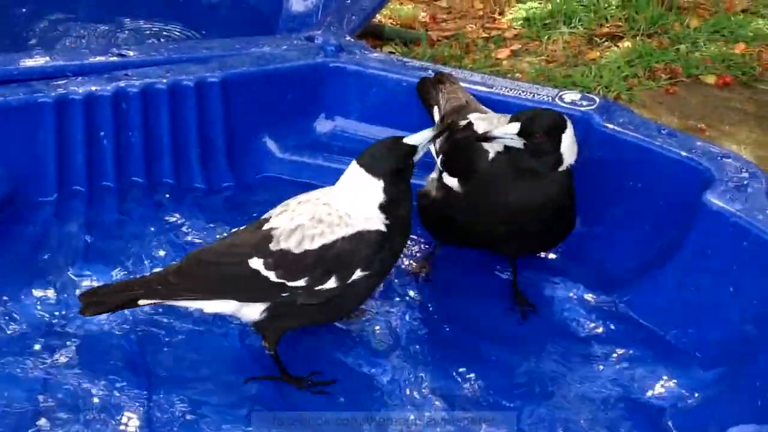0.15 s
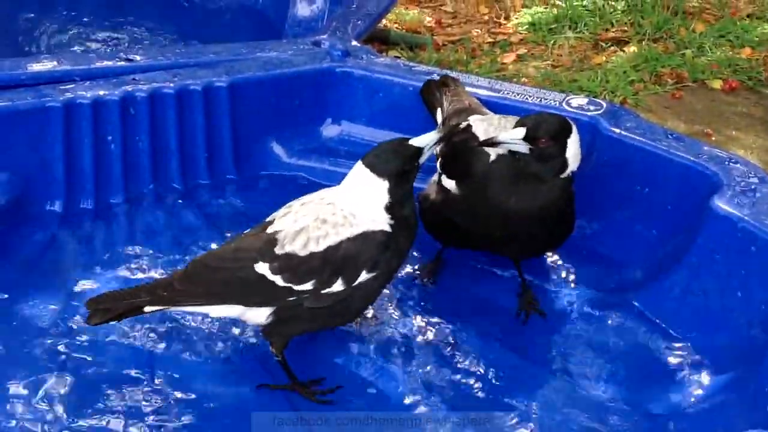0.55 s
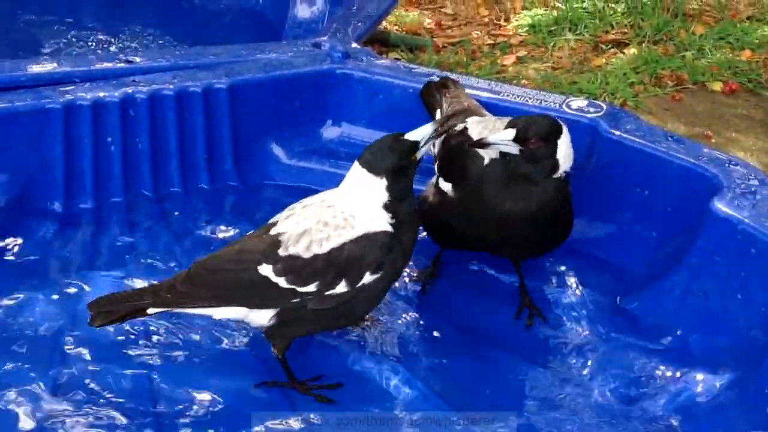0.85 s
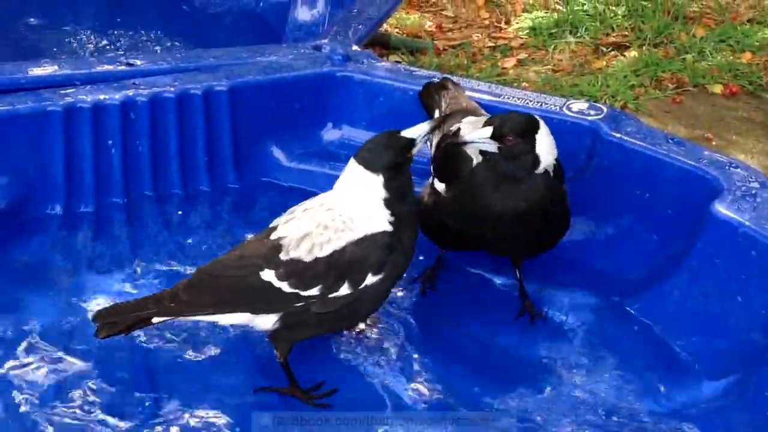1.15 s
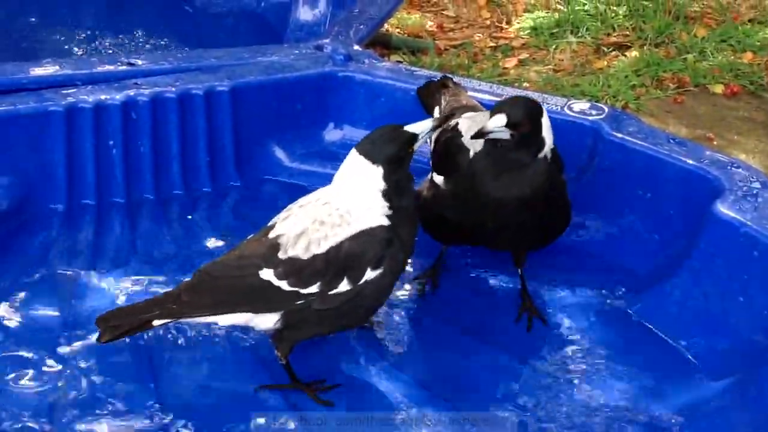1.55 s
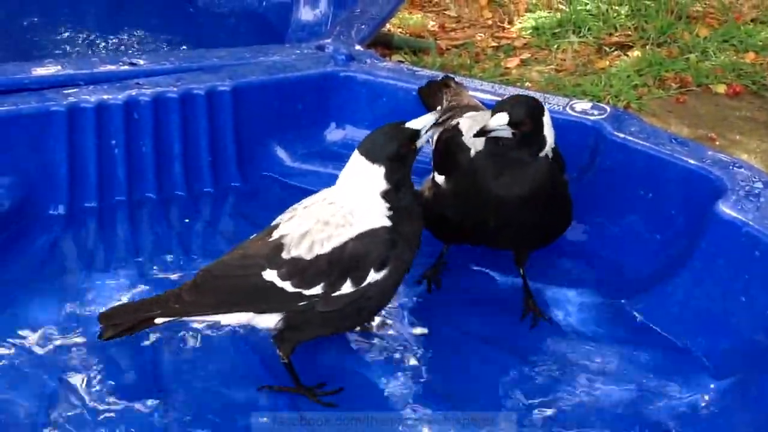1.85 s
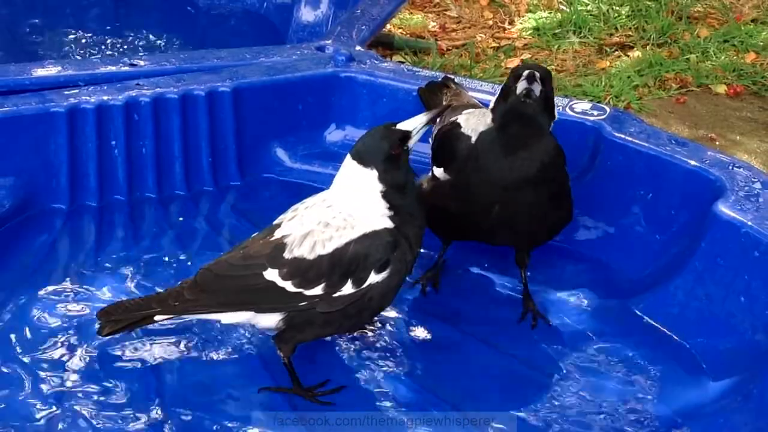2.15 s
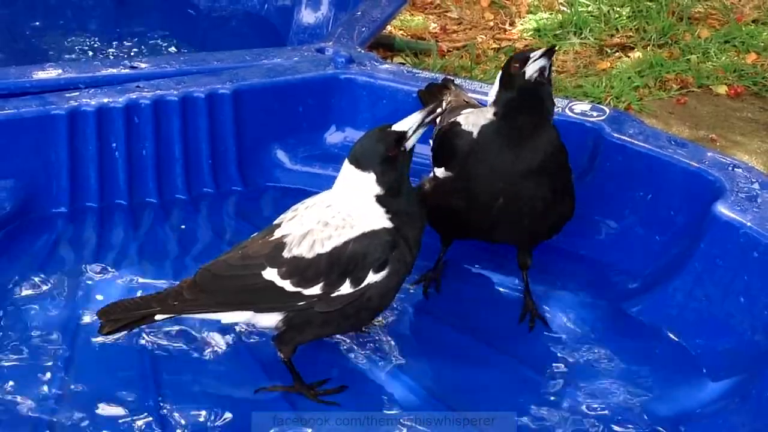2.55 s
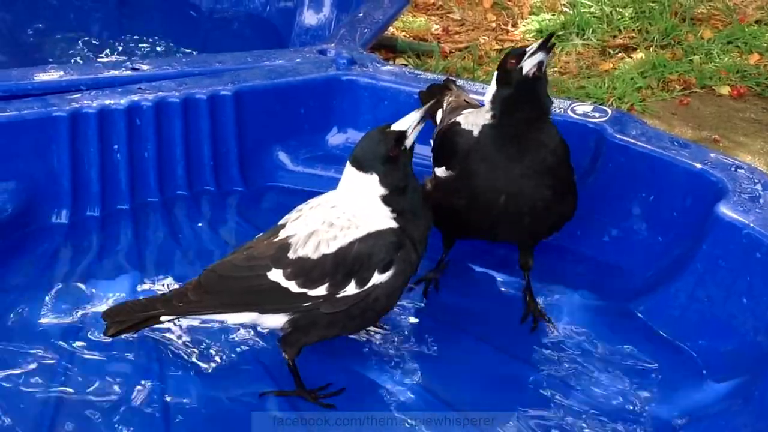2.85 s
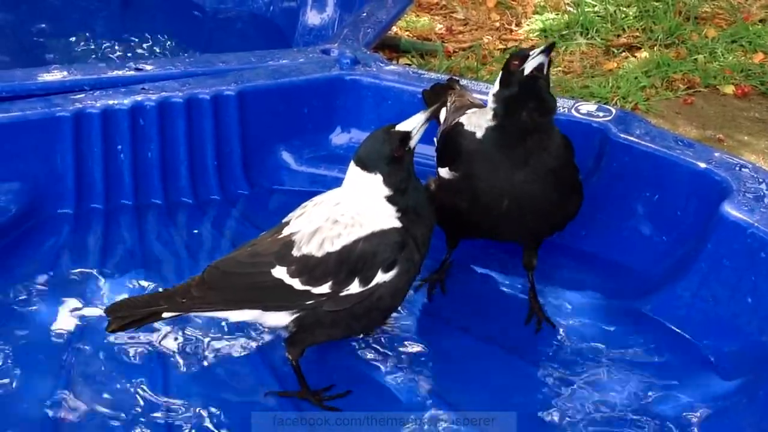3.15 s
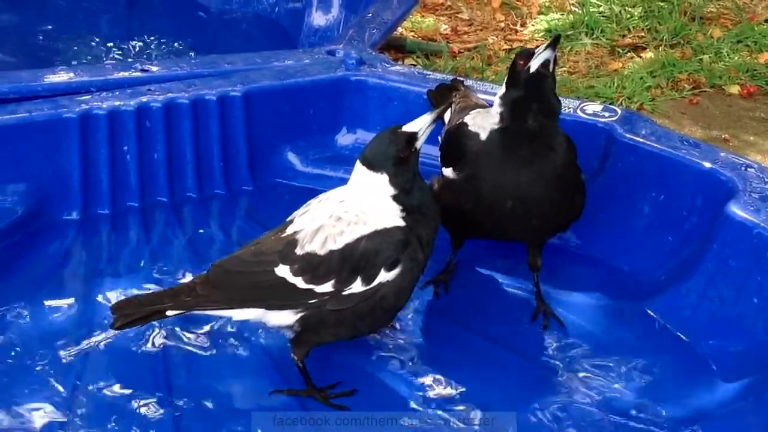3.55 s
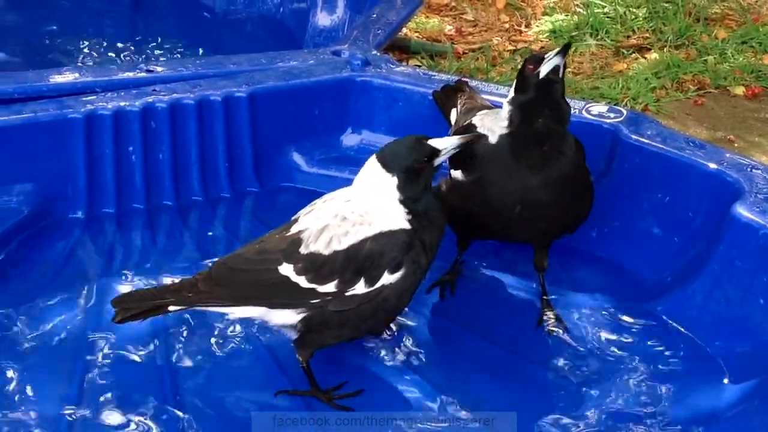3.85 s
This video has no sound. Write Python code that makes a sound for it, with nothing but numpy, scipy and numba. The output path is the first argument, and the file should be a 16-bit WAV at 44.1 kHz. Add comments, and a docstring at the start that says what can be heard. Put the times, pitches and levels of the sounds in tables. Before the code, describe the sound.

Magpies warble in overlapping whistles and throaty notes while water patters softly outdoors.

```python
"""Two magpies carol up close in a shallow plastic paddling pool. From the start, water patters and drips
over a quiet garden, and the birds, with two voices each, trade overlapping whistles and low throbbing
notes; hard notes rasp. Diving yelps join at 0.6 s as a distant rush swells and fades. From 1.2 to 2.5 s
two low voices lock into a buzz three times, with short whistles, yelps and low throbs in between. The
carol ends on a low throb near 4 s. All along, the garden returns a short echo of birds and water."""
import sys
import numpy as np
from scipy import signal
from scipy.fft import rfft, irfft
from scipy.io import wavfile
from scipy.ndimage import map_coordinates
from numba import njit

SR = 44100
rng = np.random.default_rng(int(sys.argv[2]) if len(sys.argv) > 2 else 0)


def log_audio(samples):
    """Write samples as a 16-bit WAV file to the path given in sys.argv[1]."""
    # one column per channel
    frames = np.atleast_2d(samples).T
    # limit to full scale, then quantise
    limited = np.clip(frames, -1, 1)
    pcm = np.round(limited * 32767).astype(np.int16)
    wavfile.write(sys.argv[1], SR, pcm)


N = 176400

# Tone of the garden air. Each row: frequency in Hz, relative level in dB.
GARDEN_SPECTRUM = [(18, -34), (30, -28), (130, -10.5), (187, -7), (249, -7), (505, -10), (1050, -1.5),
                   (1440, -9), (2100, -12), (2490, -7), (3070, -16), (3880, -12), (5590, -19), (9190, -19),
                   (15500, -23)]
# Fader ride on that air. Each row: time in seconds, gain in dB.
GARDEN_SWELL = [(0, -1), (.6, -1), (1.2, -2), (1.6, -4.5), (2.2, 2.5), (4, 0)]
# The distant rush. Each row: time in seconds, level in dB.
RUSH_LEVELS = [(0, -63.5), (.45, -59.5), (.62, -60.5), (.8, -66), (4, -70)]
# Beds of ringing bubbles. Each row: centre pitch in Hz, bubbles per second, bed level in dB,
# decay in seconds.
BUBBLES = [(2537, 70, -62, 0.0043), (4275, 55, -66.5, 0.003), (7700, 25, -71.5, 0.0024)]
# The clearest drops. Each row: start in seconds, level in dB, ring pitch in Hz.
DROPS = [(0.165, -30, 9020), (0.2365, -33.5, 9100), (0.2757, -27.5, 7530), (0.3828, -31, 10900),
         (0.759, -33.5, 7260), (1.123, -39.5, 4130), (1.18, -37, 4270), (1.482, -34, 9000),
         (1.6624, -38.5, 3750), (1.676, -36, 4430), (1.8458, -27.5, 8750), (2.2136, -31, 9000),
         (2.6873, -34.5, 7850), (2.8496, -31, 12300), (3.0966, -32, 8900), (3.2828, -36, 7200)]
# Whistled notes. Each row: start and length in seconds, first and last pitch in Hz, level in dB,
# attack and release in seconds, overtone and rasp weights in dB.
WHISTLES = [ (0, 0.053, 1054, 1178, -41, 0.0016, 0.0096, -45, -19.5),
            (0.066, 0.042, 1333, 1220, -36.5, 0.027, 0.012, -48, -48),
            (0.111, 0.093, 1036, 1064, -23, 0.18, 0.0075, -63, -27.5),
            (0.619, 0.049, 1264, 1267, -26.5, 0.0048, 0.0098, -12, -13.5),
            (0.631, 0.049, 1002, 1040, -21, 0.019, 0.01, -51, -12.5),
            (0.745, 0.039, 1134, 1390, -23.5, 0.011, 0.028, -50, -21),
            (0.764, 0.1, 1652, 1713, -22, 0.018, 0.0038, -35.5, -28.5),
            (0.893, 0.14, 1194, 1215, -21, 0.025, 0.026, -28, -43),
            (1.023, 0.054, 1220, 1199, -38, 0.015, 0.059, -24, -9),
            (1.053, 0.046, 1026, 966, -39, 0.064, 0.014, -37, -8.5),
            (1.614, 0.046, 1078, 998, -39.5, 0.011, 0.021, -33, -26),
            (1.785, 0.035, 1054, 1144, -22.5, 0.031, 0.0088, -54, -31),
            (1.926, 0.068, 2360, 2273, -34.5, 0.057, 0.014, -38, -33),
            (1.981, 0.033, 2200, 1640, -39, 0.0053, 0.0083, -52, -82),
            (1.984, 0.068, 1504, 1360, -33.5, 0.017, 0.0027, -66, -15),
            (1.999, 0.042, 1183, 986, -22, 0.096, 0.0046, -20, -21),
            (2.066, 0.033, 977, 1200, -21.5, 0.035, 0.026, -49, -13.5),
            (2.283, 0.037, 1086, 1124, -8.5, 0.13, 0.018, -39, -32),
            (2.493, 0.04, 1725, 1607, -23.5, 0.017, 0.025, -18, -24.5),
            (2.525, 0.1, 1276, 1261, -16.5, 0.096, 0.014, -20, -25.5),
            (2.615, 0.03, 1025, 1011, -23.5, 0.0058, 0.016, -38, -11.5),
            (2.633, 0.026, 1221, 1360, -18.5, 0.0015, 0.031, -27, -18.5),
            (2.651, 0.036, 1983, 2260, -22.5, 0.028, 0.028, -41, -17),
            (2.671, 0.035, 1835, 1836, -30.5, 0.014, 0.016, -36, -13.5),
            (2.682, 0.15, 1438, 1437, -24, 0.061, 0.0039, -28.5, -24),
            (2.806, 0.0088, 1696, 1660, -16, 0.0043, 0.01, -17, -19),
            (2.828, 0.15, 1231, 1236, -23.5, 0.019, 0.086, -9.5, -26),
            (2.849, 0.11, 1026, 1007, -18, 0.06, 0.016, -33.5, -26.5),
            (2.948, 0.11, 1271, 1147, -28, 0.035, 0.22, -28, -34),
            (3.092, 0.056, 1122, 944, -35.5, 0.017, 0.032, -35, -41),
            (3.363, 0.049, 1325, 1275, -35, 0.016, .015, -13, -6),
            (3.387, .06, 1292, 1293, -22.5, 0.0099, 0.013, -11, -13.5),
            (3.413, 0.045, 999, 1031, -20.5, 0.0062, 0.01, -17.5, -10.5),
            (3.446, 0.056, 1345, 1311, -24, 0.014, 0.1, 6, -7),
            (3.463, 0.076, 2067, 2003, -30.5, 0.028, 0.08, -30, -44),
            (3.515, 0.064, 1013, 993, -26, 0.046, 0.014, -33, -54),
            (3.814, 0.041, 1086, 1132, -19, 0.0098, 0.034, -27, -22),
            (3.772, 0.048, 890, 830, -41, 0.0096, 0.013, -22, -31),
            (3.79, 0.073, 1112, 1095, -34.5, 0.022, 0.014, -51, -22)]
# Whistle overtones, richest in the odd ones. Each row: harmonic number, weight in dB.
WHISTLE_HARMONICS = [(2, -10.5), (3, 2.5), (4, -17), (5, -13), (7, -19.5)]
# Low throbbing notes. Each row: start and length in seconds, first and last pitch in Hz, level in dB,
# attack and release in seconds, throbs per second, throb depth from 0 to 1, rasp weight in dB.
CHORTLES = [ (0.038, 0.041, 745, 715, -27, 0.0063, 0.058, 50.4, 0.99, -34),
            (0.217, 0.062, 677, 681, -35.5, 0.044, 0.0053, 51, 0.57, -41),
            (1.168, 0.024, 706, 792, -27, 0.0085, 0.013, 72, 0.36, -35),
            (1.206, 0.033, 789, 820, -21.5, 0.0041, 0.013, 55, 1, -26),
            (1.598, 0.026, 765, 806, -29, 0.014, 0.012, 42, 0.4, -22),
            (2.044, 0.041, 768, 794, -27, 0.0076, 0.024, 55, 0.75, -16.5),
            (2.097, .05, 902, 868, -25.5, 0.026, 0.036, 85, 0.54, -9),
            (2.133, 0.15, 645, 671.7, -27, 0.087, 0.0057, 82, 0.42, -44),
            (2.455, 0.039, 711, 839, -19, 0.017, 0.014, 74.8, 0.85, -22.5),
            (2.754, 0.041, 777, 814, -33.5, .01, 0.017, 45, 1, -23),
            (3.079, 0.045, 763, 780, -21.5, 0.018, 0.03, 45.6, 0.82, -42),
            (3.114, 0.1, 694, 663, -23.5, 0.059, 0.012, 25, 0.46, -31),
            (3.214, 0.053, 792, 834, -21, 0.017, 0.015, 29, 0.46, -14),
            (3.583, .1, 806.5, 759.6, -16, 0.049, 0.048, 62.6, 0.84, -17.5),
            (3.838, 0.17, 779, 721, -28, 0.065, 0.046, 51.4, 1, -48)]
# Chortle overtones. Each row: harmonic number, weight in dB.
CHORTLE_HARMONICS = [(2, -3.5), (4, -16.5)]
# Sharp diving notes. Each row: start and length in seconds, landing pitch in Hz, level in dB,
# dive in octaves, rasp weight in dB.
YELPS = [(0.574, 0.024, 1566, -25.5, 0.51, -21), (.599, 0.018, 1500, -30, 0.13, -17),
         (0.882, 0.017, 1500, -20.5, 0.12, -27.5), (1.8897, 0.023, 1646, -16.5, 0.45, -26),
         (1.917, 0.022, 1500, -22.5, 0.107, -20), (3.348, 0.024, 1651, -19, 0.78, -15.5),
         (3.376, 0.017, 1550, -20, 0.17, -11)]
# Two low voices locked together. Each row: start and length in seconds, the lower voice's first and
# last pitch in Hz, upper pitch in Hz, level in dB, attack and release in seconds, rasp weight in dB.
BUZZES = [(1.192, 0.039, 828, 772, 937, -39.5, 0.026, 0.012, -6),
          (1.596, 0.21, 770, 712, 883, -35, 0.23, 0.06, 4.5),
          (2.319, 0.15, 691.7, 746.8, 894.3, -30.5, 0.12, 0.066, 4)]
# Tones of the buzz. Each row: multiple of the lower voice, multiple of the upper voice, weight in dB.
BUZZ_TONES = [(1, 0, 3), (0, 1, -3.5), (-1, 2, 0), (2, 0, -16), (1, 1, -9), (0, 2, -6), (0, 3, -14.5)]
# Narrow windpipe resonances. Each row: centre in Hz, width in Hz, gain in dB.
WINDPIPE = [(1890, 450, 8), (2560, 90, 2.5), (3005, 74, 5.5), (4540, 87, 0), (5080, 100, 2),
            (5885, 420, -1), (6800, 200, 2)]
# Resonances that move as throat and beak open. Each row: time in seconds, throat in Hz, beak in Hz.
GAPE = [(.65, 4110, 7380), (1.22, 3940, 8400), (2.41, 3830, 7930), (2.95, 3810, 8000), (3.25, 3220, 7950),
        (3.43, 4140, 8250), (3.63, 3780, 7550)]
# Reflections of the rasp off the water and pool walls. Each row: delay in seconds, linear gain.
POOL_REFLECTIONS = [(.0009, -0.0013), (.0023, -0.25), (.0037, .4), (.0058, 0.66)]
# Final EQ on the rasp. Each row: frequency in Hz, relative gain in dB.
RASP_EQ = [(1240, -28), (1750, -7), (3900, -1), (5000, -1.5), (7100, -12.5), (9600, -10.5), (12400, -11.5),
           (13500, -10), (15500, -24)]

GARDEN_DB, RUSH_BAND_HZ = -54, (184, 365)
PATTER_PER_S, PATTER_DB, PATTER_SPREAD_DB = 420, -59.5, 6.5
PATTER_HZ, PATTER_DECAY_CYCLES, DROP_DECAY_CYCLES = (7280, 14200), 1.6, 7.5
LAPS_PER_S, LAP_DB = 14, 3.5
WAVER, ROUGH_WAVER, WAVER_PER_S = .002, .11, 266.7
OVERTONE_FLUTTER, SHIMMER, FLUTTER_PER_S = 0.043, 0.11, 220.4
BREAK_DEPTH, BREAK_PER_S = .13, 700
RASP_JITTER_RAD, RASP_JITTER_PER_S, RASP_AIR, RASP_TRIM_DB = 0.27, 500, 0.46, -5.5
THROAT_WIDTH_HZ, THROAT_DB, BEAK_WIDTH_HZ, BEAK_DB, BEAK_OVERTONE = 570, 4, 140, 9, 1.51
VOICE_LOW_CUT_HZ, RASP_LOW_CUT_HZ, DIVE_S = 476, 1400, 0.00256
ECHO_DB, ECHO_DELAY_S, ECHO_T60_S, ECHO_TOP_HZ = -19, 0.014, .25, 7100
SLAP_S, SLAP_DB = 0.058, -30


def undb(db):
    """Decibels to gain."""
    return 10 ** (np.asarray(db) / 20)


def unit(x):
    """Scale to rms 1."""
    return x / np.sqrt(np.mean(x ** 2) + 1e-20)


def add(out, start, x):
    """Mix a sound in at a start time in seconds."""
    i = max(int(start * SR), 0)
    out[i:i + len(x)] += x[:max(N - i, 0)]


def colour(x, points):
    """EQ by a (Hz, dB) curve, then scale to rms 1."""
    hz, db = np.array(points).T
    bins_hz = np.maximum(np.arange(len(x) // 2 + 1) * SR / len(x), 1)
    gain = undb(np.interp(np.log(bins_hz), np.log(hz), db))
    return unit(irfft(rfft(x) * gain, len(x)))


def cut(x, hz, kind, order=2):
    """Butterworth filter."""
    return signal.sosfilt(signal.butter(order, hz, kind, fs=SR, output="sos"), x)


def wander(samples, rate):
    """A smooth random wobble, at `rate` steps a second."""
    steps = rng.standard_normal(size=256)
    return map_coordinates(steps, [np.arange(samples) / SR * rate], order=3, mode="mirror")


def swell(length, attack, release):
    """Time axis and rounded attack-hold-release envelope of a note."""
    t = np.arange(int(length * SR)) / SR
    ramp = lambda u: np.sin(np.pi / 2 * np.clip(u, 0, 1)) ** 1.366
    return t, ramp(t / attack) * ramp((length - t) / release)


@njit
def resonate(x, hz, width):
    """A resonance whose centre may move; gain 1 at the centre."""
    y, band_state, low_state = np.empty(len(x)), 0., 0.
    for i in range(len(x)):
        tuning, damping = np.tan(np.pi * hz[i] / SR), width / hz[i]
        band = (band_state + tuning * (x[i] + 1e-18 - low_state)) / (1 + tuning * (tuning + damping))
        band_state = 2 * band - band_state
        low_state += 2 * tuning * band
        y[i] = damping * band
    return y


def garden():
    """The bed: outdoor air that swells slowly, and a low distant rush."""
    fader = lambda points: undb(np.interp(np.arange(N) / SR, *np.array(points).T))
    rush = unit(cut(rng.standard_normal(N), RUSH_BAND_HZ, "band"))
    air = colour(rng.standard_normal(N), GARDEN_SPECTRUM)
    return undb(GARDEN_DB) * fader(GARDEN_SWELL) * air + fader(RUSH_LEVELS) * rush


def bubble(hz, decay):
    """A small bubble rings: a sine that starts within a cycle, rises a little and dies."""
    t = np.arange(int(6 * decay * SR) + 2) / SR
    env = (1 - np.exp(-t * hz)) * np.exp(-t / decay)
    return env * np.sin(2 * np.pi * hz * t * (1 + 0.011 * t / decay))


def patter():
    """Tiny droplets of every size tick on the water at random, more strongly as it laps."""
    out, (low, high) = np.zeros(N), PATTER_HZ
    for when, pitch, smallness in rng.random((int(PATTER_PER_S * N / SR), 3)):
        hz = low * (high / low) ** pitch
        db = -PATTER_SPREAD_DB * np.log(smallness + .02)  # many faint ticks, a few strong ones
        add(out, when * N / SR, undb(db) * bubble(hz, PATTER_DECAY_CYCLES / hz))
    lapping = undb(LAP_DB * wander(N, LAPS_PER_S))
    return undb(PATTER_DB) * unit(out * lapping)


def water():
    """Fine patter, a few sharp drops that splash and ring, and beds of bubbles."""
    t = np.arange(256) / SR
    out = patter()
    for start, db, hz in DROPS:
        splash = cut(rng.standard_normal(len(t)) * np.exp(-t / 0.0011), 5600, "high")
        add(out, start, undb(db) * bubble(hz, DROP_DECAY_CYCLES / hz))
        add(out, start, undb(db) * 0.13 * splash)
    for centre_hz, rate, db, decay in BUBBLES:
        bed = np.zeros(N)
        for when, pitch, smallness in rng.random((int(rate * N / SR), 3)):
            hz = centre_hz * 2 ** (.35 * (pitch - .5))
            add(bed, when * N / SR, undb(-14 * smallness) * bubble(hz, decay))
        out += undb(db) * unit(bed)
    return out


def sing(hz, rasp_db):
    """Phase of one voice; the raspier it is, the more its pitch wavers."""
    waver = (WAVER + ROUGH_WAVER * undb(rasp_db)) * wander(len(hz), WAVER_PER_S)
    return 2 * np.pi * np.cumsum(hz * (1 + waver)) / SR


def whistle(hz, env, overtones_db, rasp_db):
    """Tone and rasp of a near-pure note, rough at its edges, whose overtones grow as it is pushed."""
    flutter = lambda depth: 1 + depth * wander(len(env), FLUTTER_PER_S)
    phase = sing(hz, rasp_db)
    push = env * (0.11 + 2.04 * np.linspace(0, 1, len(env)) ** 2)
    overtones = sum(undb(db) * flutter(OVERTONE_FLUTTER) * np.sin(k * phase)
                    for k, db in WHISTLE_HARMONICS)
    tone = np.sqrt(2) * env * flutter(SHIMMER) * (np.sin(phase) + undb(overtones_db) * push * overtones)
    edges = 4 * env * (1 - env)  # peaks halfway up and halfway down
    tone *= 1 + BREAK_DEPTH * edges * wander(len(env), BREAK_PER_S)
    return tone, undb(rasp_db) * env ** 0.92 * rattle(phase)


def whistles():
    """Gliding whistles that beat where they overlap; yields start, level, tone and rasp."""
    for start, length, hz, end_hz, db, attack, release, overtones_db, rasp_db in WHISTLES:
        t, env = swell(length, attack, release)
        yield start, db, *whistle(np.linspace(hz, end_hz, len(t)), env, overtones_db, rasp_db)


def rattle(phase):
    """The rasp: membranes slap shut once a cycle, unevenly, and let a little air through."""
    cycles = (phase + RASP_JITTER_RAD * wander(len(phase), RASP_JITTER_PER_S)) / (2 * np.pi)
    samples_from_slap = (cycles % 1 - .5) / np.gradient(phase / (2 * np.pi))
    slaps = np.sinc(samples_from_slap) * np.exp(-(samples_from_slap / 5) ** 2)
    slaps *= 1 + 0.043 * wander(len(phase), RASP_JITTER_PER_S)
    return unit(slaps - slaps.mean()) + RASP_AIR * rng.standard_normal(len(phase))


def throat(rasp):
    """The rasp rings the steady windpipe, and the throat and beak, which reshape from note to note."""
    when, *tracks = np.array(GAPE).T
    throat_hz, beak_hz = (np.interp(np.arange(N) / SR, when, hz) for hz in tracks)
    steady = [(np.full(N, float(hz)), width, db) for hz, width, db in WINDPIPE]
    moving = [(throat_hz, THROAT_WIDTH_HZ, THROAT_DB),
              (beak_hz, BEAK_WIDTH_HZ, BEAK_DB),
              (BEAK_OVERTONE * beak_hz, 2 * BEAK_WIDTH_HZ, BEAK_DB)]
    ringing = sum(undb(db) * resonate(rasp, hz, float(width)) for hz, width, db in steady + moving)
    return .35 * rasp + ringing  # some rasp leaks straight through


def chortles():
    """Low notes that throb: in each gap the fundamental ducks while pitch, overtones and rasp rise."""
    for start, length, hz, end_hz, db, attack, release, rate, depth, rasp_db in CHORTLES:
        t, env = swell(length, attack, release)
        gap = depth * (1 - np.abs(np.sin(np.pi * rate * t)))
        bend = 1 + 0.12 * (gap - gap.mean())
        phase = sing(np.linspace(hz, end_hz, len(t)) * bend, rasp_db)
        overtones = undb(rasp_db / 2) * sum(undb(h_db) * np.sin(k * phase)
                                            for k, h_db in CHORTLE_HARMONICS)
        tone = np.sqrt(2) * env * ((1 - gap) * np.sin(phase) + (0.25 + gap) * overtones)
        rasp = undb(rasp_db) * env ** 0.92 * (.5 + 2 * gap) * rattle(phase)
        yield start, db, tone, rasp


def yelps():
    """Short, sharp whistles that dive onto their pitch."""
    for start, length, hz, db, octaves, rasp_db in YELPS:
        t, env = swell(length, attack=.007, release=0.0087)
        dive_hz = hz * 2 ** (octaves * np.exp(-t / DIVE_S))
        yield start, db, *whistle(dive_hz, env, overtones_db=-30.5, rasp_db=rasp_db)


def buzzes():
    """Two low voices lock, adding sum and difference tones; the rasp pulses at their beat."""
    for start, length, hz, end_hz, upper_hz, db, attack, release, rasp_db in BUZZES:
        t, env = swell(length, attack, release)
        lower = sing(np.linspace(hz, end_hz, len(t)), rasp_db=-11)
        upper = sing(np.full(len(t), upper_hz), rasp_db=-36)
        # higher-order tones bloom later and fade sooner
        tone = sum(undb(tone_db) * env ** ((abs(a) + b + 1) / 2) * np.sin(a * lower + b * upper)
                   for a, b, tone_db in BUZZ_TONES)
        rasp = undb(rasp_db) * env ** 4 * (1 + .5 * np.cos(upper - lower)) * rattle(upper)
        yield start, db, np.sqrt(2) * tone, rasp


def magpies():
    """The carol on two buses: clean tone, and rasp coloured by pool, throat and beak."""
    tone_bus, rasp_bus = np.zeros(N), np.zeros(N)
    for start, db, tone, rasp in (*whistles(), *yelps(), *chortles(), *buzzes()):
        add(tone_bus, start, undb(db) * tone)
        add(rasp_bus, start, undb(db) * rasp)
    in_pool = rasp_bus.copy()
    for delay, gain in POOL_REFLECTIONS:
        add(in_pool, delay, gain * rasp_bus)
    coloured = cut(colour(throat(in_pool), RASP_EQ), RASP_LOW_CUT_HZ, "high")
    rasp = undb(RASP_TRIM_DB) * rasp_bus.std() * unit(coloured)
    return cut(tone_bus, VOICE_LOW_CUT_HZ, "high", order=5) + rasp


def echo(x):
    """The surroundings return a short, dull scatter and one distinct slapback."""
    t = np.arange(SR // 2) / SR
    tail = cut(rng.standard_normal(len(t)), ECHO_TOP_HZ, "low")
    tail *= np.exp(-np.log(1000) * t / ECHO_T60_S) * (t > ECHO_DELAY_S)
    out = undb(ECHO_DB) * signal.fftconvolve(x, tail / np.linalg.norm(tail))[:N]
    add(out, SLAP_S, undb(SLAP_DB) * cut(x, ECHO_TOP_HZ, "low"))
    return out


def scene():
    """Mono mix: birds and water up front, their echo and the garden behind."""
    near = magpies() + water()
    return (near + echo(near) + garden())[None]


def record(dry):
    """A steep high cut at 15.4 kHz on the whole mix."""
    return signal.sosfilt(signal.ellip(10, .2, 80, 15400, fs=SR, output="sos"), dry)


dry = scene()
out = record(dry)
log_audio(out)
```